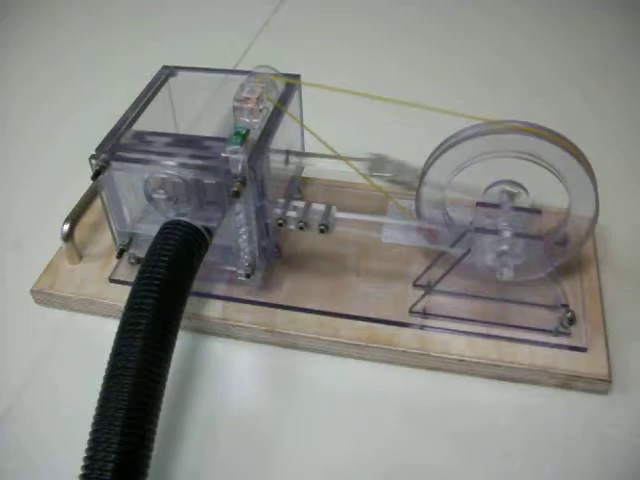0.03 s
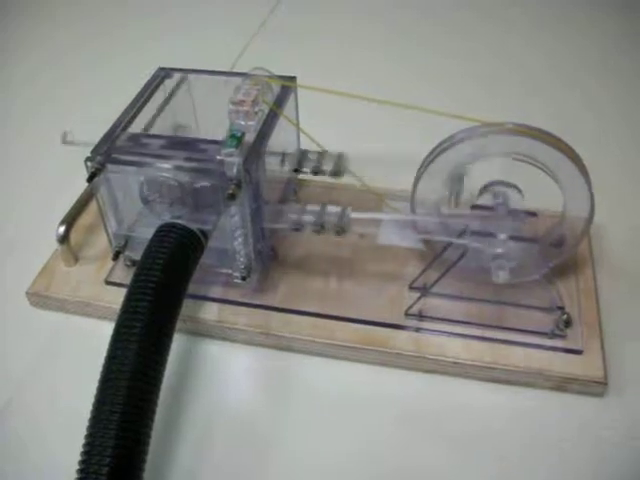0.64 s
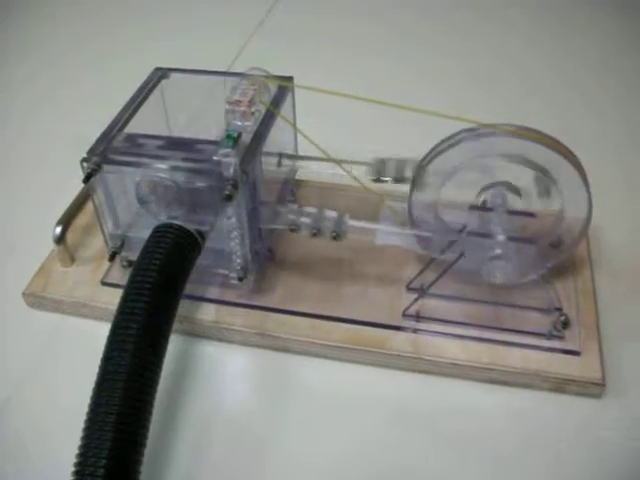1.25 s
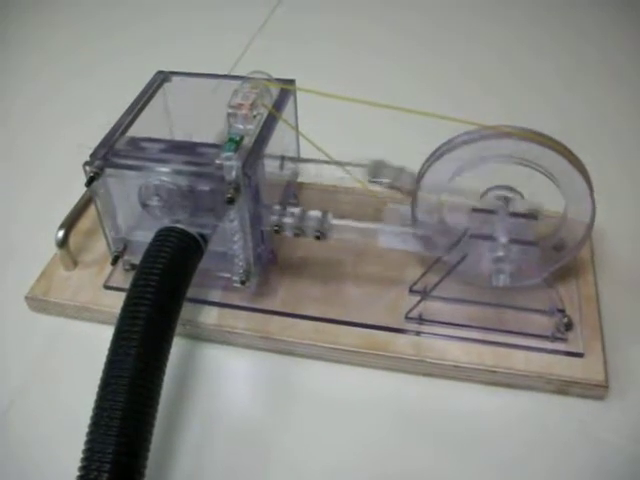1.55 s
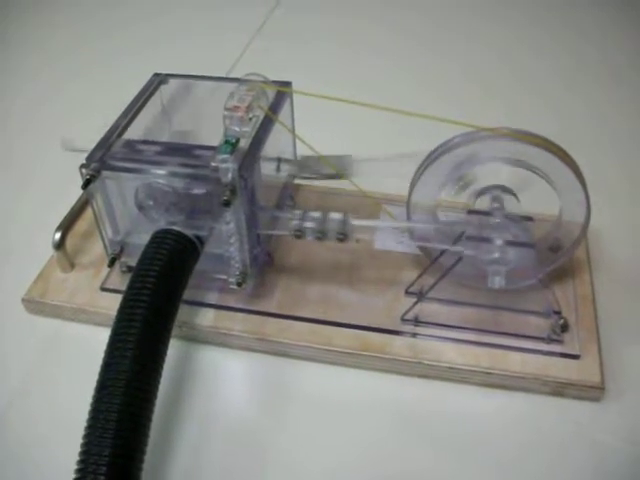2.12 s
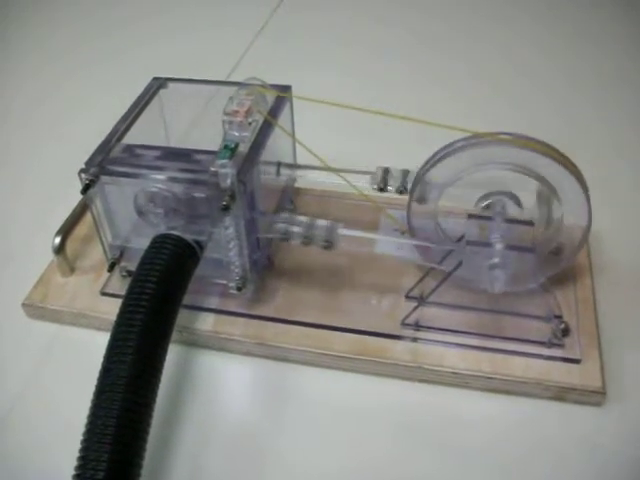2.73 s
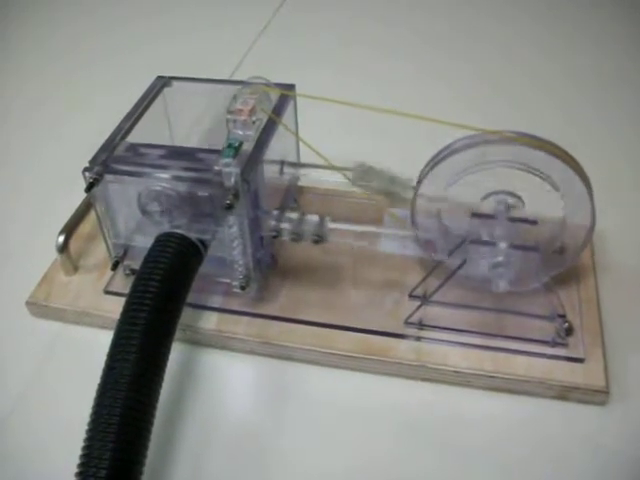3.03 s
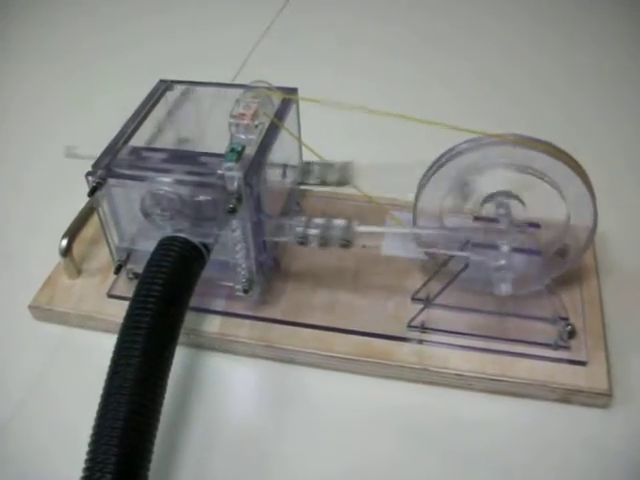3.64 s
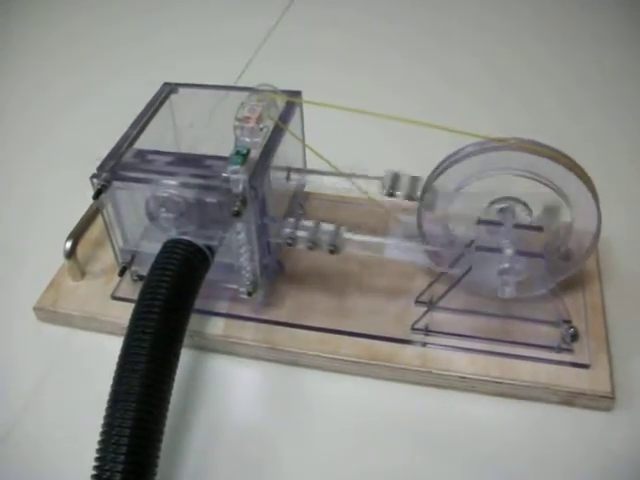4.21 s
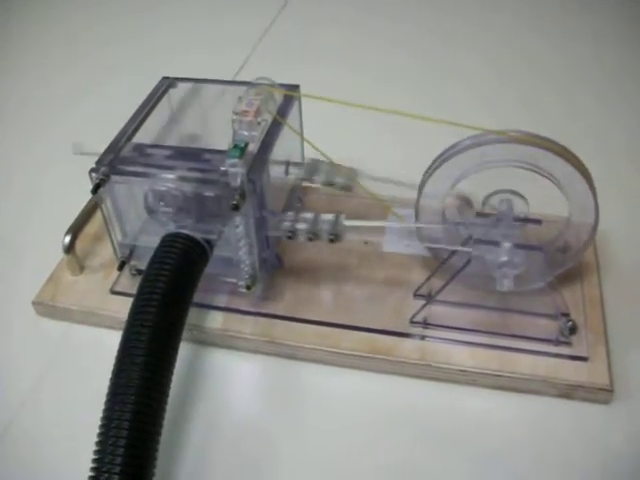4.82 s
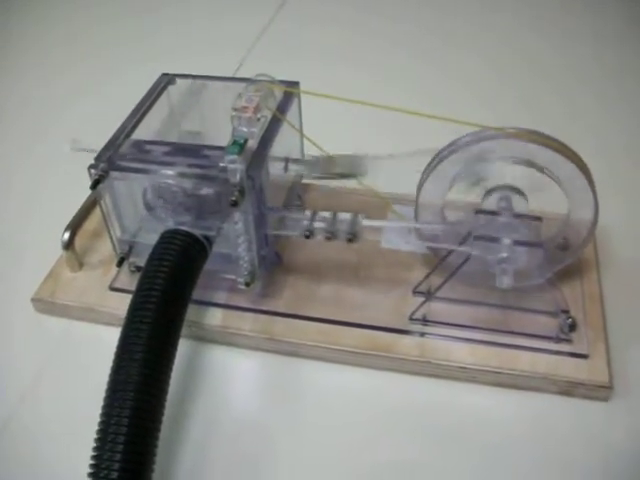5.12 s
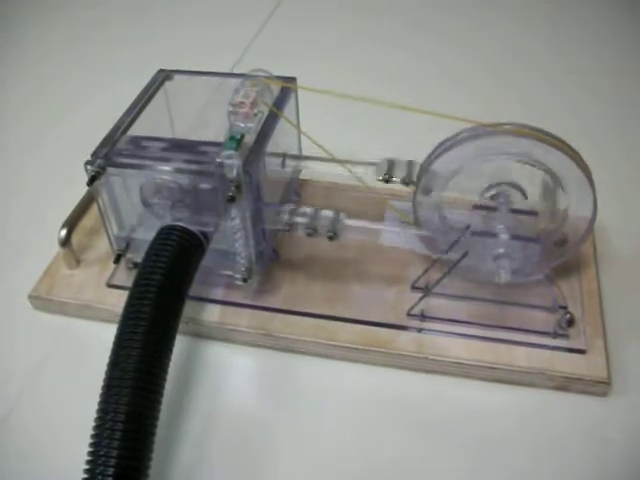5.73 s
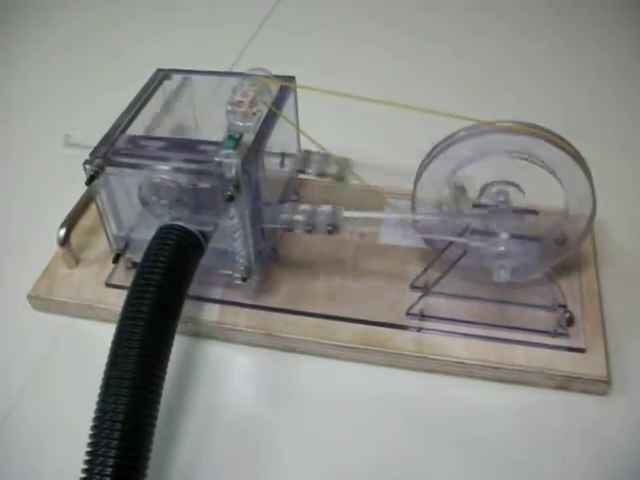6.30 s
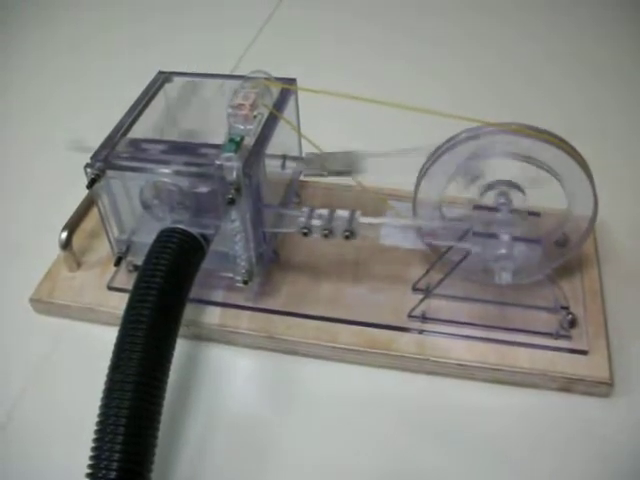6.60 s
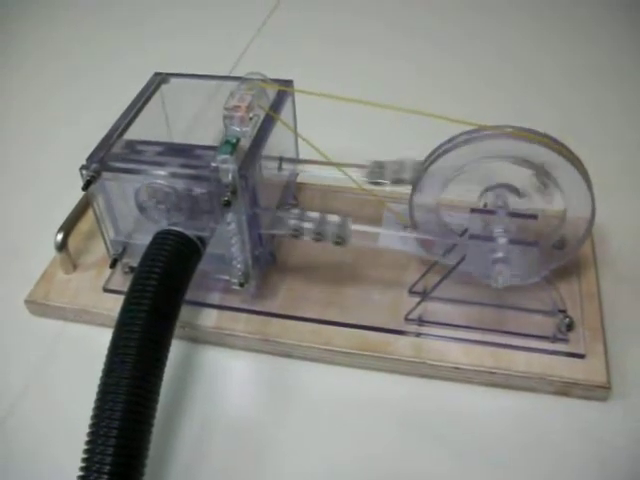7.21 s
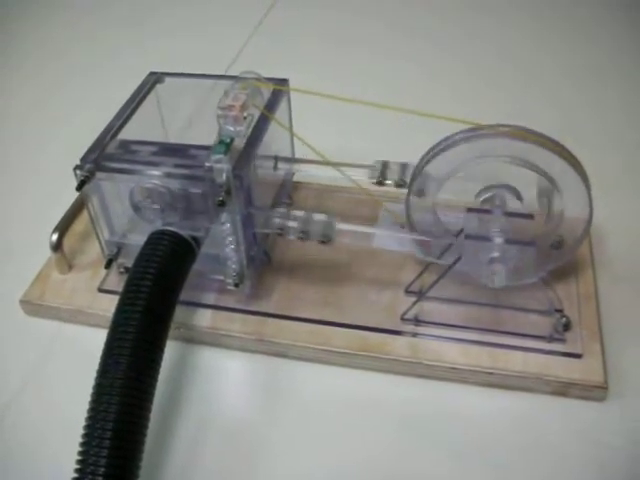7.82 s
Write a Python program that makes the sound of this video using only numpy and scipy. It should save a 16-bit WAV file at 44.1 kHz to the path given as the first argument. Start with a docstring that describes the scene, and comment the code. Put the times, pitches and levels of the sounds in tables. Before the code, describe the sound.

A small plastic model engine runs on the suction of a vacuum hose. Air rushes through it with a loud, steady hiss and a high, breathy whistle. Quick, even puffs pulse through the rush, each with a light plastic clack and a soft thump. The suction motor whines faintly behind, and a few sharp ticks stand out. Near the end the rhythm speeds up. It is heard close by in a small room.

```python
"""A rush of air with a whistle in it, chuffing and clacking: a plastic model engine runs on a table
indoors, driven by the suction of a vacuum hose. Air hisses through its slide valve and whistles in
the open port. Twice a turn the valve shuts, the flow dips, and the other port opens with a puff,
a thump and a clack of the linkage. The suction motor whines faintly behind it all.
Near the end the flywheel speeds up."""
import sys
import numpy as np
from scipy import signal
from scipy.fft import rfft, irfft, next_fast_len
from scipy.io import wavfile
from scipy.ndimage import uniform_filter1d

SR = 44100
rng = np.random.default_rng(int(sys.argv[2]) if len(sys.argv) > 2 else 0)


def log_audio(samples):
    """Write samples as a 16-bit WAV file to the path given in sys.argv[1]."""
    # one column per channel
    frames = np.atleast_2d(samples).T
    # limit to full scale, then quantise
    limited = np.clip(frames, -1, 1)
    pcm = np.round(limited * 32767).astype(np.int16)
    wavfile.write(sys.argv[1], SR, pcm)


N = 351036
TIME = np.arange(N) / SR

# Tones of the suction motor. Each row: pitch in Hz, average level in dB.
MOTOR_TONES = [(140, -66), (854, -52.5), (980, -52), (1019, -60.5), (1241, -56.5), (1368, -52),
               (2851, -41.5), (4124, -47)]
# Speed of the flywheel. Each row: time in seconds, turns a minute.
FLYWHEEL_SPEED = [(0, 159.7), (0.7, 157.4), (1.4, 161.4), (2.2, 157.2), (3, 160.0), (4.9, 159.7),
                  (5.4, 168.3), (6, 160.3), (6.7, 169.5), (7.05, 166.7), (7.96, 205.6)]
# The two ports, which open in turn. Each row: relative levels of puff, thump and clack in dB.
PORT_LEVELS = [(-17, -47.5, -31), (-15.5, -52, -32.5)]
# The rod lands harder. Each row: rough time in seconds, change of thump in dB, change of clack in dB.
HEAVY_STROKES = [(1.07, 4, 2), (1.63, 4.5, 1.5), (2.01, 1, 0), (2.77, 1, 4), (2.95, 6, -6.5),
                 (3.15, 4, -0.5), (3.33, 0.5, 5), (3.71, 6, 3.5), (4.08, 3, 4), (4.27, 5, 1),
                 (5.02, 6, -0.5), (5.21, 8, 2), (5.38, -3, 3.5), (6.48, 7.5, 2), (7.19, 5, -0.5),
                 (7.53, 1, 0)]
# Ringing of the plastic parts. Each row: pitch in Hz, relative level in dB, seconds to fade by 60 dB.
HOUSING_RINGS = [(353, -12, 0.042), (576, -5, 0.056), (780, -8.5, .014), (886, 2, 0.019), (1190, 2, 0.017),
                 (1300, -9, 0.019), (2050, -7.5, .012)]
# Hollow knocks of the housing. Each row: start in seconds, pitch in Hz, peak level in dB.
HOUSING_KNOCKS = [(4.826, 925, -23), (7.84, 898, -18.5)]
# Brief bright ticks of overload. Each row: time in seconds, peak level in dB before clipping.
OVERLOAD_TICKS = [(1.556, -0.5), (2.959, -1.5), (3.531, 0.5), (4.838, 1), (5.034, 0.5), (5.47, 0),
                  (6.308, -2.5), (6.494, 0), (7.204, 0), (7.69, -0.5), (7.846, 0)]
# The puff as a port opens. Each row: frequency in Hz, relative level in dB.
PUFF_SPECTRUM = [(100, -29.5), (1300, -10.5), (2100, 1), (3400, 1), (3900, 0.5), (4550, 4.5), (5300, -5.5),
                 (6000, -19)]
# Air hissing through the valve chest. Each row: frequency in Hz, relative level in dB.
HISS_SPECTRUM = [(700, -26.5), (1200, -20.5), (1460, -13.5), (1680, -6), (2120, -1.2), (2600, -0.56),
                 (3400, 0.46), (3880, -4.5), (4130, -2.5), (4380, -2.5), (4800, 0.1), (5120, -7),
                 (5450, -6.5), (5900, -23)]
# The low roar in the hose. Each row: frequency in Hz, relative level in dB.
ROAR_SPECTRUM = [(20, -14), (90, -20), (140, -7.5), (240, -6), (325, 3), (500, -1.5), (580, 2), (720, 0),
                 (880, 1), (1130, -3.5), (1380, -4), (2200, -14.5)]
# Air ringing in the half-open slit. Each row: pitch in Hz, width in Hz, relative level in dB.
SLIT_RINGS = [(1815, 140, -35), (2206, 450, -23.5), (2670, 890, -23), (4120, 260, -26.5)]
# The sound fades in. Each row: time in seconds, gain in dB.
FADE_IN = [(.07, -97), (.073, -15), (.087, -12), (.1, -2), (.125, 0)]


def amp(db):
    """Turns decibels into a gain to multiply by."""
    return 10 ** (np.asarray(db) / 20)


def unit_level(x):
    """Scales a sound to an average (rms) level of 1."""
    return x / np.sqrt(np.mean(x ** 2) + 1e-20)


def noise(gain):
    """Noise at level 1, its spectrum shaped by the function gain(Hz)."""
    size = next_fast_len(N)
    spectrum = rfft(rng.standard_normal(size)) * gain(np.fft.rfftfreq(size, 1 / SR))
    return unit_level(irfft(spectrum, size)[:N])


def coloured(points):
    """Noise whose spectrum follows (Hz, dB) points."""
    hz, db = np.transpose(points)
    return noise(lambda f: amp(np.interp(np.log(f + 1), np.log(hz), db)))


def wander(rate_hz):
    """A smooth random drift, mostly slower than rate_hz."""
    return noise(lambda f: 1 / (1 + (f / rate_hz) ** 2))


def blown(rings):
    """Swirling air rings at several pitches, each a (Hz, width in Hz, dB) peak."""
    def gain(f):
        """Adds up the power of the peaks."""
        return np.sqrt(sum(amp(db) ** 2 / width / (1 + ((f - hz) / width * 2) ** 2) ** 2
                           for hz, width, db in rings))
    return noise(gain) * np.linalg.norm([amp(db) for _, _, db in rings])


def breathy_tone(hz, width_hz):
    """Noise ringing at the moving pitch hz: shift it down to zero, smooth twice, shift it back."""
    spin = np.exp(2j * np.pi * np.cumsum(hz) / SR)
    pole = np.exp(-np.pi * width_hz / SR)
    smoothed = signal.lfilter([1], np.poly([pole, pole]), rng.standard_normal(N) / spin)
    return unit_level((spin * smoothed).real)


def clicks(times, sizes):
    """One-sample clicks at the given times."""
    out = np.zeros(N)
    np.add.at(out, np.clip(np.round(times * SR).astype(int), 0, N - 1), sizes)
    return out


def low_pass(x, edge_hz, taps):
    """Cuts away the treble above edge_hz."""
    return signal.oaconvolve(x, signal.firwin(taps, edge_hz, window=("kaiser", 9), fs=SR), "same")


def flywheel(first_change=.66):
    """Strokes done (two a turn), and haste: the share by which the speed is above its usual value."""
    rpm = np.interp(TIME, *np.transpose(FLYWHEEL_SPEED))
    done = np.cumsum(2 * rpm / 60) / SR - first_change
    return done, rpm / np.median(rpm) - 1


def port_changes(spread_db=(.8, 1.9, 1.9)):
    """The ports take turns, never quite alike. Each row: time in seconds, puff, thump and clack in dB."""
    done, _ = flywheel()
    count = np.arange(int(done[-1]) + 1)
    times = np.interp(count, done, TIME)
    levels = np.array(PORT_LEVELS)[count % 2] + rng.standard_normal((len(count), 3)) * spread_db
    for at, thump_db, clack_db in HEAVY_STROKES:
        levels[np.argmin(abs(times - at)), 1:] += thump_db, clack_db
    return np.column_stack([times, levels])


def passing(position, at, width):
    """A bump from 0 to 1 and back as the valve passes one place in its stroke."""
    return np.exp(-.5 * (((position - at + .5) % 1 - .5) / width) ** 2)


def room(x, echo_db=-15, fade_s=0.13, echoes_per_s=2000):
    """The hard walls of a small room add echoes that die away fast."""
    t = TIME[:SR // 2]
    echoes = rng.standard_normal(len(t)) * (rng.random(len(t)) < echoes_per_s / SR)
    echoes *= (t > .004) * amp(-60 * t / fade_s)
    return x + amp(echo_db) * signal.oaconvolve(x, echoes / np.linalg.norm(echoes))[:N]


def motor(waver=0.003037):
    """The suction motor gives faint tones that waver together."""
    clock = np.cumsum(1 + waver * wander(6.29)) / SR
    return sum(np.sqrt(2) * amp(db) * np.sin(2 * np.pi * (hz * clock + rng.random()))
               for hz, db in MOTOR_TONES)


def hose_gusts(changes, boost_db=5, lag_s=.002, top_hz=260, knee_hz=18):
    """The air in the hose is stopped and let go at each port change: a short low gust."""
    times, _, thump_db, _ = changes.T
    gust = signal.windows.gaussian(SR // 10 + 1, .0075 * SR)
    swell = signal.oaconvolve(clicks(times + lag_s, amp(thump_db + boost_db)), gust, "same")
    return swell * noise(lambda f: 1 / (1 + (f / top_hz) ** 4) / np.sqrt(1 + f / knee_hz))


def housing_knocks(swell_s=0.0033):
    """On the hardest strokes one hollow note of the housing swells for a few cycles and dies."""
    out = np.zeros(N)
    for start, hz, db in HOUSING_KNOCKS:
        age = np.clip(TIME - start, 0, .2)
        swell = (age / swell_s * np.exp(1 - age / swell_s)) ** 2
        out += amp(db) * swell * np.sin(2 * np.pi * hz * age)
    return out


def overload_ticks(hz=3500, decay_s=.00025):
    """Brief bright ticks where loud peaks overload the recorder."""
    times, db = np.transpose(OVERLOAD_TICKS)
    t = np.arange(-SR // 200, SR // 200) / SR
    tick = np.exp(-abs(t) / decay_s) * np.cos(2 * np.pi * hz * t)
    return signal.oaconvolve(clicks(times, amp(db)), tick, "same")


def linkage(changes, push_s=0.00027, rattles_per_s=70):
    """The rod takes up its slack in three blows that shove and ring the housing; loose joints rattle."""
    starts, _, thump_db, clack_db = changes.T[:, :, None]
    times = starts + np.array([-.007, .002, .008]) + .0022 * rng.standard_normal((len(starts), 3))
    rattle = (rng.random(N) < rattles_per_s / SR) * rng.standard_normal(N)
    t = TIME[:SR // 10]
    push = t / push_s * np.exp(1 - t / push_s)  # a dull shove with no ring
    ring = sum(amp(db - 60 * t / fade_s) * np.sin(2 * np.pi * hz * t)
               for hz, db, fade_s in HOUSING_RINGS)
    thumps = clicks(times, np.array([.4, 1, .7]) * amp(thump_db + 1)) + amp(-46) * rattle
    clacks = clicks(times, np.array([.5, 1, .5]) * amp(clack_db + 3)) + amp(-49) * rattle
    return (signal.oaconvolve(thumps, push) + signal.oaconvolve(clacks, ring))[:N]


def puffs(changes, boost_db=0.5, lead_s=0.0011, rise_s=.007):
    """Air bursts into the emptied cylinder at each port change: a quick rise, a slower fall."""
    swell = np.zeros(N)
    for start, db, _, _ in changes:
        near = slice(int((start - .01) * SR), int((start + .06) * SR))
        age = np.maximum(TIME[near] - start + lead_s, 0) / rise_s
        swell[near] += amp(db + boost_db) * (age * np.exp(1 - age)) ** 2
    return swell * coloured(PUFF_SPECTRUM)


def cylinder_ring(position, hz=4180, width_hz=270, level_db=-27, uneven_db=2):
    """Air in the short, freshly opened cylinder rings until the piston moves away."""
    just_opened = np.exp(-.5 * ((position - .115) / .045) ** 2)
    return blown([(hz, width_hz, level_db)]) * just_opened * amp(uneven_db * wander(3.6))


def port_whistle(position, haste, hz=2935, hollow_hz=640, sag=0.035, arch=0.091, climb=0.15):
    """The open port whistles over a hollow note; the pitch bends each stroke and climbs with speed."""
    from_middle = position - .5
    bend = 1 - sag * from_middle - arch * from_middle ** 2 + climb * haste + .007 * wander(14)
    tone = breathy_tone(hz * bend, width_hz=200)
    loudness = np.sqrt(abs(uniform_filter1d(tone ** 2, size=SR // 30)) + 1e-9)
    steady = unit_level(tone / loudness ** .6)  # the suction holds the whistle fairly even
    hollow = breathy_tone(hollow_hz * bend, width_hz=180)
    return amp(-23) * steady + amp(-43) * hollow


def airflow(hiss_db=-18, roar_db=-32, flutter_db=1.49, sway_db=0.32):
    """Fluttering air hisses, roars and whistles; the half-open slit rasps and takes air from the rest."""
    done, haste = flywheel()
    position = done % 1  # runs from 0 to 1 between port changes
    # The valve shuts just before a port change and is half open on either side of that.
    shut = passing(position, at=-.074, width=.029)
    half_open = passing(position, at=-.14, width=.055) + passing(position, at=.11, width=.055)
    wide_open = np.sin(np.pi * position) ** 2
    hiss = coloured(HISS_SPECTRUM) * amp(hiss_db - 4.5 * shut - half_open)
    roar = coloured(ROAR_SPECTRUM) * amp(roar_db - 5 * half_open - 9 * haste)
    whistle = port_whistle(position, haste) * amp(-1.5 + 3 * wide_open - 6 * half_open - 2 * shut)
    rasp = blown(SLIT_RINGS) * half_open * amp(.1 - 22 * haste)  # a fast valve barely lingers half open
    air = hiss + roar + whistle + rasp + cylinder_ring(position)
    return air * amp(flutter_db * wander(170) + sway_db * wander(25))


def scene():
    """Moving air, clacking parts, bright ticks and the motor sound together in the room."""
    changes = port_changes()
    air = airflow() + puffs(changes) + hose_gusts(changes)
    parts = linkage(changes) + housing_knocks()
    return room(air + parts + overload_ticks() + motor())[None]


def record(dry, round_at=.78, clip_at=.71):
    """The sound fades in; the microphone rounds off peaks, loses the top treble and clips the loudest."""
    fade = amp(np.interp(TIME, *np.transpose(FADE_IN))) * (TIME > FADE_IN[0][0])
    heard = dry[0] * fade
    rounded = heard / (1 + (heard / round_at) ** 4) ** .25
    dulled = low_pass(rounded, edge_hz=6000, taps=221)
    clipped = np.clip(dulled, -clip_at, clip_at)
    return low_pass(clipped, edge_hz=15870, taps=511)[None]


dry = scene()
out = record(dry)
log_audio(out)
```